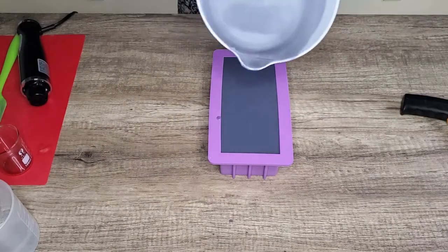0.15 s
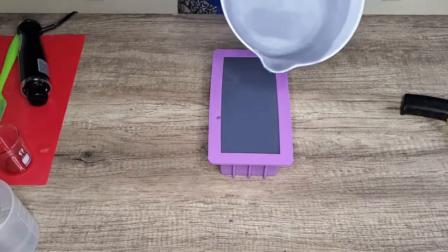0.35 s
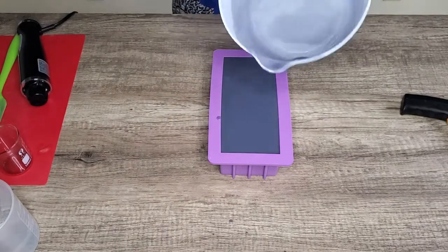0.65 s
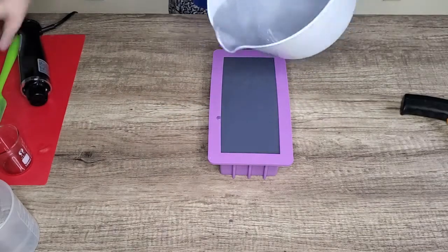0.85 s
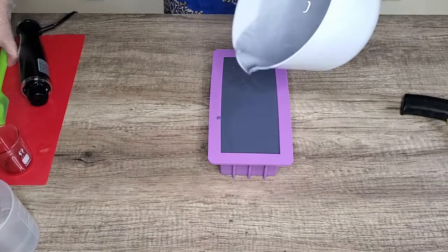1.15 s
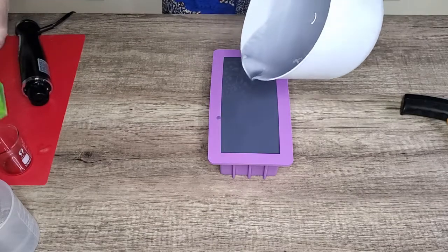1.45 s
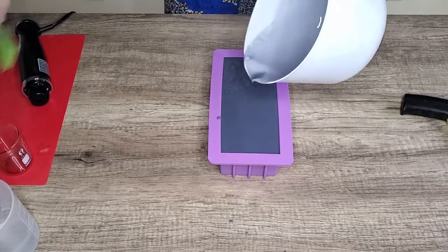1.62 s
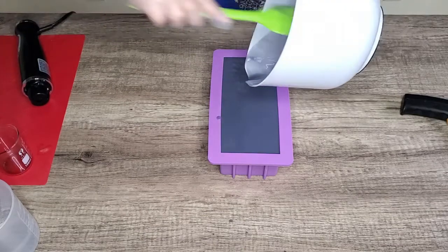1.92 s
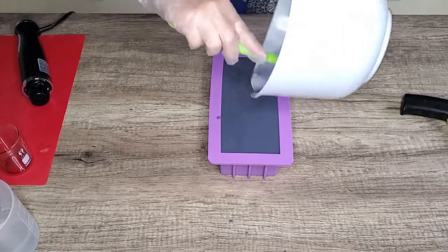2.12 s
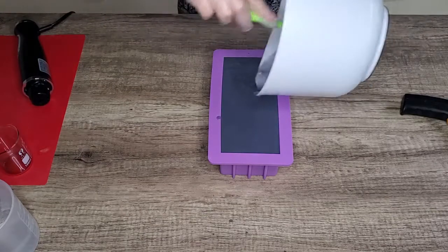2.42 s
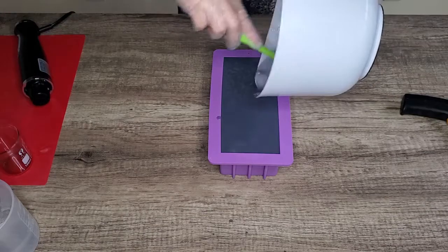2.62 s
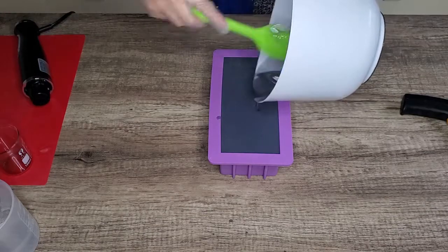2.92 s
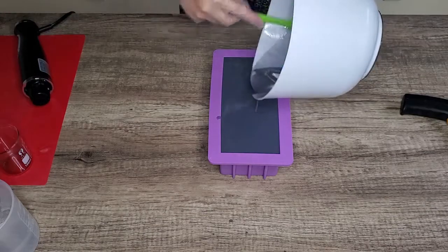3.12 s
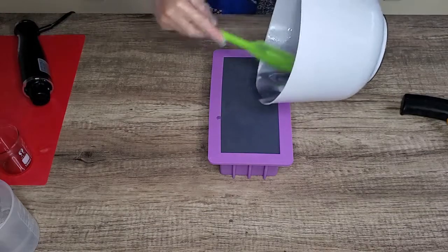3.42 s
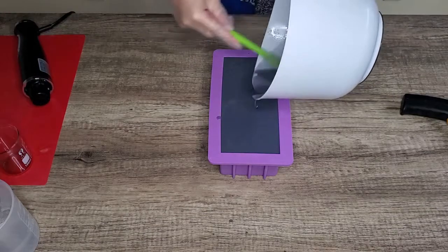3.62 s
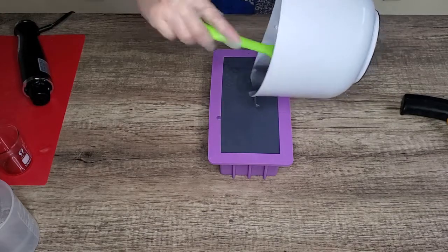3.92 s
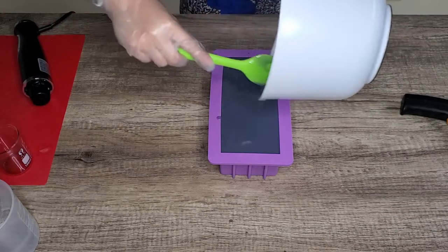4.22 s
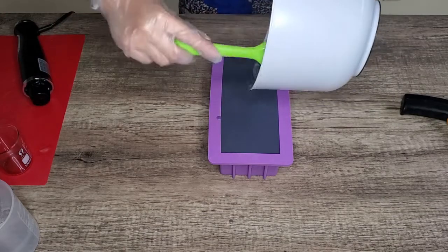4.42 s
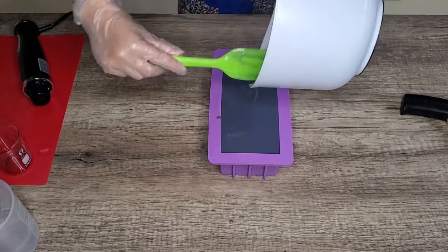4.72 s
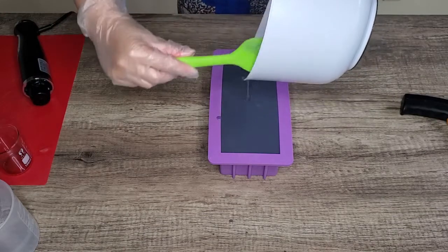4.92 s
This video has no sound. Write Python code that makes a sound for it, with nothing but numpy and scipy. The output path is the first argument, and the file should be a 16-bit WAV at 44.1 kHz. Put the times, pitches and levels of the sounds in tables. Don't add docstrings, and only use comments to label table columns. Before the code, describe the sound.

Cloth rustles and something is dragged and peeled off a mat, then a soft spatula knocks dully and hollowly on a plastic bowl in a quiet room.

```python
import sys
import numpy as np
from scipy import signal
from scipy.io import wavfile

SR = 44100
rng = np.random.default_rng(int(sys.argv[2]) if len(sys.argv) > 2 else 0)


def linear_from_db(decibels):
    return 10 ** (np.asarray(decibels, float) / 20)


def store_wav(level_fs):
    pcm = np.round(np.clip(np.atleast_2d(level_fs), -1, 1) * 32767)
    wavfile.write(sys.argv[1], SR, pcm.T.astype(np.int16))


N = 223078
EARLY = round(2.4 * SR)

# [t/s, click level/dB, thud f/Hz, thud level over click/dB, middle wall modes over click/dB]
KNOCK_BLOWS = [(2.1213, -35, 337, 2, -6), (2.1623, -48.5, 286, 3, -10), (2.2, -57, 308, -14, -6),
               (3.1556, -41, 318, 1, -8), (3.692, -38.5, 295, 7, -3.5), (4.051, -57.5, 320, 10.5, 2),
               (4.0946, -64, 290, 12, -12), (4.275, -83, 700, 7, 2), (4.5254, -70, 740, 13.5, -1),
               (4.531, -82, 172, 28, 0), (4.5427, -83, 272, 23, -10), (4.588, -76, 318, 4, -1),
               (4.7272, -75, 264, 13, 3), (4.801, -92, 252, 13, -10), (5.0059, -75.5, 292, 27.5, 18.5)]


def knocks():
    return soft_blows(KNOCK_BLOWS, thud_cycles=7.3)


# [t/s, click level/dB, thud f/Hz, thud level over click/dB, middle wall modes over click/dB]
HANDLE_DROPS = [(0.548, -80.5, 202, 19.5, 19), (.657, -72, 182, 17, 19.5), (1.048, -78, 237, 34, 23),
                (1.072, -80.5, 244, 37, 0), (1.108, -78, 332, 38.5, 3), (1.126, -79, 342, 38, 16),
                (1.113, -77, 231, 33.5, 23), (1.325, -94, 264, 30, 2), (2.653, -87.5, 199, 31, 4)]


def handle_drops():
    return soft_blows(HANDLE_DROPS, thud_cycles=18.4)


# [f/Hz, level/dB, t60/s]
WALL_MODES = [
    [(500, -7, 0.053), (624.4, -5, 0.034), (816, -2.5, 0.012)],
    [(1150, -1, 0.0083), (1407, 2, 0.01)],
    [(1785, -2, 0.0043), (2350, 5, 0.0038), (2920, -7.5, 0.0036)],
]


def soft_blows(rows, thud_cycles):
    out = np.zeros((2, N))
    for s, click_db, hz, thud_db, middle_db in rows:
        thud_s = s - 0.00073
        level_db = click_db + thud_db
        add(out, thud_s, level_db, hz, thud_cycles / hz, 1.5, rise=0.39, sign=-1.87)
        add(out, thud_s, level_db - 4, 80, .06, 0, rise=0.022)
        add(out, s, level_db - 9, 165, .05, 0, rise=0.2)

        low_db = -7.5 + 0.97 * thud_db
        modes = []
        for extra_db, group in zip((low_db, middle_db, 0), WALL_MODES):
            modes += [(extra_db, *mode) for mode in group]
        modes.append((-0.7 * thud_db, 3544.5, -15, 0.0144))
        for k, (extra_db, mode_hz, mode_db, t60) in enumerate(modes):
            sign = (-1) ** k
            add(out, s, click_db + extra_db + mode_db + 6.5, mode_hz, t60, 1.5, rise=1.0, sign=sign)
    return lowpass(out, 3, 3060)


# [f/Hz, level/dB, t60/s, swell/cycles]
BELLY_BLOWS = [
    (2.562, [(634, -31.5, 0.065, 0.17), (743, -27, 0.019, 0.34), (990, -37, 0.018, 0.15), (500, -24, 0.025, 0.26), (1400, -53, 0.02, 0.42), (1960, -34, 0.0046, 0.47), (341.5, -34, 0.47, 2.8), (285, -42.5, 0.13, 0.91)]),
    (2.587, [(404.6, -28, 0.15, 1.1), (435.3, -26.5, 0.14, 1.4)]),
    (2.621, [(495, -38, 0.17, 4.2), (509.6, -30.5, 0.42, 3.6), (440, -43, 0.36, 3.6)]),
]


def bonk(lasting):
    out = np.zeros((2, N))
    for s, modes in BELLY_BLOWS:
        for k, (hz, db, t60, swell) in enumerate(modes):
            if (t60 > 0.15) == lasting:
                add(out, s, db, hz, t60, .4, swell, sign=(-1) ** k)
    return lowpass(out, 2, 3200)


# [t/s, level/dB, main f/Hz, second f/Hz, second level/dB]
HARD_TICKS = [
    (.986, -71, 9600, 11800, -2),
    (1.158, -52.5, 2300, 1280, -8),
    (1.109, -41.5, 2710, 4600, -8),
    (2.189, -70, 4000, 2200, 4),
    (2.644, -65.5, 9440, 3580, 2.5),
    (3.21, -79, 4340, 3000, 10),
]
# [t/s, level/dB, main f/Hz, second f/Hz, second level/dB]
PEEL_SNAPS = [
    (1.0447, -45, 2650, 4930, -7),
    (1.054, -42, 3380, 6870, -11),
]


def ticks():
    out = np.zeros((2, N))
    for rows, pan_db in ((HARD_TICKS, 2), (PEEL_SNAPS, 3.5)):
        for s, db, hz, hz2, db2 in rows:
            add(out, s, db + 10, hz, .008, pan_db, rise=0.98)
            add(out, s, db + db2 + 6.0, hz2, .008, pan_db, rise=0.22)
    return out


# [start t/s, hold/s, level/dB]
SMEAR_STROKES = [
    (2.27, 0.035, -75),
    (2.76, 0.017, -80),
    (3.26, 0.0099, -69),
    (4.17, 0.046, -81),
]
# [f/Hz, level/dB per Hz]
BATTER_COLOUR = [(700, -31), (1000, 3.5), (1400, -2.5), (1900, -13), (3000, -16), (5000, -24)]


def smear():
    level_db, = strokes(SMEAR_STROKES, rise=74, fall=155)
    return linear_from_db(level_db) * noise(BATTER_COLOUR, 3.2, 4.3)


# [t/s, f/Hz, level/dB]
MOAN_CURVE = [(4.25, 504.0, -92), (4.286, 519, -93), (4.314, 535, -77.5), (4.468, 547.3, -70),
              (4.514, 529, -87), (4.55, 616, -61)]


def moan():
    s, *columns = np.transpose(MOAN_CURVE)
    t = np.arange(N) / SR
    hz, db = [np.interp(t, s, c, left=-150, right=-150) for c in columns]
    return np.sqrt(2) * linear_from_db(db + 1.0 * drift(20, N)) * np.sin(2 * np.pi * np.cumsum(hz) / SR)


# [start t/s, hold/s, crackle level/dB, swish level/dB]
PEEL_STROKES = [
    (1.044, 0.0081, -38, -66),
    (1.075, 0.017, -46.5, -71.5),
    (1.108, .008, -45, -80),
    (1.15, 0.034, -50, -74.5),
]
# [f/Hz, level/dB per Hz]
STICKY_COLOUR = [(880, -53), (1500, -24), (1770, -4.5), (2180, -21), (2640, 4), (3460, -2), (3740, -14),
                 (4150, -5), (12000, -20), (15600, -63), (22000, -120)]


def peel(swish):
    crackle_db, swish_db = strokes(PEEL_STROKES, rise=5000, fall=213)
    return linear_from_db(crackle_db - 5.5) * noise(STICKY_COLOUR, 2.35, 28, size=EARLY) + linear_from_db(swish_db) * swish


# [start t/s, hold/s, rumble level/dB, rasp level/dB]
DRAG_STROKES = [
    (0.59, .01, -59.5, -75),
    (0.664, 0.007, -53, -56.5),
    (0.7, 0.081, -60.5, -87),
    (1.056, 0.041, -48, -53.5),
    (1.136, .008, -52, -63),
    (1.155, 0.045, -43.5, -42),
    (1.19, .015, -49, -48),
]
# [f/Hz, level/dB per Hz]
MAT_COLOUR = [(35, -45), (60, -21), (173, -83), (237, 2.5), (422, 4.5), (478, -11), (776, -8.5),
              (1150, -22.5), (2500, -31), (3250, -44), (5500, -120)]
# [f/Hz, width/Hz, level/dB]
TABLE_MODES = [(140, 18, -5), (237, 25, 14.5), (320, 20, -3), (431, 6.8, 16), (581, 21, 14.5), (798, 19, 6),
               (990, 26, 4.5), (1286, 9.3, 14.5), (1607, 60, 11)]


def dragging():
    rubbing = lifted(noise(MAT_COLOUR, 3.2, 28, size=EARLY), TABLE_MODES)
    low = lowpass(rubbing, 4, 770)
    high = signal.sosfilt(signal.butter(4, 770, "high", fs=SR, output="sos"), rubbing)
    rumble_db, rasp_db = strokes(DRAG_STROKES, rise=710, fall=204)
    mix = linear_from_db(rumble_db - 3.0) * rms_one(low) + linear_from_db(rasp_db) * rms_one(high)
    left, right = np.sqrt(EARLY / N) * mix
    return np.array([left, np.roll(right, round(0.00026 * SR))])


# [start t/s, hold/s, rub level/dB, swish level/dB]
SLEEVE_STROKES = [
    (0.066, 0.11, -56.5, -62),
    (0.2, 0.2, -63, -66),
    (0.39, 0.024, -57.5, -64),
    (0.55, .085, -57.5, -60.5),
    (0.662, 0.017, -53, -53),
    (0.9, 0.048, -73, -71.5),
]
# [f/Hz, level/dB per Hz]
RUB_COLOUR = [(530, -63), (900, -15), (1110, -27), (1320, -11), (2020, 0), (3710, 1), (4640, -5),
              (7000, -11.5), (9100, -50), (15400, -120)]


def sleeves(swish):
    rub_db, swish_db = strokes(SLEEVE_STROKES, rise=119, fall=183)
    return linear_from_db(rub_db) * noise(RUB_COLOUR, 1.4, 14, size=EARLY) + linear_from_db(swish_db) * swish


# [start t/s, hold/s, crinkle level/dB, swish level/dB]
REACH_STROKES = [
    (1.19, 0.004, -65, -66.5),
    (1.3, 0.027, -72.5, -81),
    (1.35, .02, -69, -72),
    (1.385, 0.019, -64.5, -69.5),
    (1.525, 0.012, -75.5, -80),
    (1.685, 0.034, -77, -88),
    (1.86, 0.066, -67.5, -83),
    (2.13, .07, -77.5, -79),
]
# [f/Hz, level/dB per Hz]
GLOVE_COLOUR = [(1180, -24), (2000, -16), (3070, -7), (3520, -8), (3870, -3.5), (5610, -7), (6450, 1),
                (7270, -12), (9000, -14), (11700, -40), (19800, -120)]


def glove(swish):
    crinkle_db, swish_db = strokes(REACH_STROKES, rise=315, fall=163)
    return linear_from_db(crinkle_db) * noise(GLOVE_COLOUR, 1.0, 21, size=EARLY) + linear_from_db(swish_db) * swish


# [f/Hz, level/dB per Hz]
SWISH_COLOUR = [(2650, -27), (4500, -4), (4770, -36.5), (5460, -10.5), (8120, -8), (12400, -6.5),
                (15700, -12)]


def handling():
    swish = noise(SWISH_COLOUR, 0.95, 34, size=EARLY)
    return (sleeves(swish) + glove(swish) + peel(swish)) * pan(1.5)


# [f/Hz, t60/s, level/dB]
REFLECTIONS = [(61, 0.17, -1), (290, 0.37, -4), (637, 0.38, -4), (1190, 0.43, -3.5), (3000, 0.32, -2.5),
               (10000, 0.28, -2)]


def room(x):
    t = np.arange(SR // 2) / SR
    table = np.array(REFLECTIONS)
    tail = 0
    for hz, band in stereo_bands(29, 16000, size=len(t)):
        tail = tail + linear_from_db(at_hz(table[:, ::2], hz) - 60 * t / at_hz(table, hz)) * band
    tail = tail * np.clip(t / 0.001 - 1, 0, 1)
    return linear_from_db(-23.5) * signal.fftconvolve(x, tail, axes=1)[:, :N]


# [start t/s, hold/s, deep level/dB, boom level/dB]
HOUSE_SWELLS = [(0.0, 0.28, -55.5, -67), (.26, 0.49, -65, -63), (0.68, 0.075, -52.5, -60.5),
                (.82, 0.14, -62, -59), (1.08, .1, -54, -67), (1.2, 0.0068, -55, -50.5),
                (1.42, 0.12, -63, -65), (1.72, 0.15, -62.5, -62), (1.92, 0.23, -63.5, -64),
                (2.6, 0.089, -61, -61.5), (3.19, 0.06, -58.5, -59.5), (3.48, 0.039, -64.5, -79),
                (3.9, 0.27, -63, -66.5)]
# [f/Hz, level/dB per Hz]
DEEP_COLOUR = [(13, -31), (22, 1), (43, -1.5), (59, -1.5), (81, -2), (113, -27), (130, 4.5), (170, -50.5),
               (290, -120)]
BOOM_COLOUR = [(59, -50.5), (100, -2.5), (277, -1.5), (312, -6), (430, -7), (533, -6), (581, -11),
               (705, -10.5), (963, -35), (1300, -4.5), (1690, -49.5), (2860, -120)]
# [f/Hz, width/Hz, level/dB]
STANDING_WAVES = [(237, 15, -13.5), (320, 14, 1), (534.7, 25, 5.5), (724, 14.5, 7.5)]


def house():
    deep_db, boom_db = strokes(HOUSE_SWELLS, rise=73.5, fall=70)
    deep_db = np.maximum(deep_db, -68.5)
    boom_db = np.maximum(boom_db, -67.5)
    deep = lifted(noise(DEEP_COLOUR, 3.3, 20), [(37.65, 2.5, 6), (78.6, 4.2, 2.3)])
    boom = lifted(noise(BOOM_COLOUR, 2.3, 7), STANDING_WAVES)
    return linear_from_db(deep_db) * rms_one(deep) + linear_from_db(boom_db) * rms_one(boom)


# [f/Hz, level/dB per Hz]
HISS_COLOUR = [(530, -23.5), (900, -8.5), (979, -4), (1260, -28.5), (1870, -5), (5810, -10), (6630, -28),
               (7650, -13), (14400, -10), (15700, 0)]


def hiss():
    whine = (6820, 390, 0.58)     # f/Hz, width/Hz, level/dB
    return linear_from_db(-82.5) * lifted(noise(HISS_COLOUR, 0.53, 30), [whine]) * pan(1.1)


def add(out, s, db, hz, t60, pan_db, rise, sign=1):
    start = round(s * SR)
    t = np.arange(min(N - start, int(1.5 * t60 * SR))) / SR
    swell = 1 - np.exp(-t * hz / rise)
    mode = sign * linear_from_db(db - 60 * t / t60) * swell * np.sin(2 * np.pi * hz * t)
    out[:, start:start + len(t)] += mode * pan(pan_db / 2)


def strokes(rows, rise, fall):
    start, hold, *levels = np.transpose(rows)[..., None]
    t = np.arange(N) / SR
    loss_db = rise * np.maximum(start - t, 0) + fall * np.maximum(t - start - hold, 0)
    return [np.max(level_db - loss_db, axis=0) for level_db in levels]


def noise(spectrum, patchy_db, rate, size=N):
    together = drift(rate / 3, size)
    x = 0
    for hz, band in stereo_bands(spectrum[0][0], spectrum[-1][0], size):
        flicker_db = patchy_db * (1.33 * together + drift(rate, size))
        x = x + linear_from_db(at_hz(spectrum, hz) + flicker_db) * band
    return np.pad(rms_one(x), [(0, 0), (0, N - size)])


# [f/Hz, likeness/0 to 1]
LEFT_RIGHT_LIKENESS = [(30, 0.9), (125, 0.8), (300, 0.85), (600, 0.56), (1200, 0), (4000, 0.11), (16000, 0)]


def stereo_bands(low_hz, high_hz, size):
    white = rng.standard_normal((2, 2, size))
    edges = 20 * 2 ** (np.arange(30) / 3)
    for k, (low, high) in enumerate(zip(edges, edges[1:])):
        if high > low_hz and low < high_hz:
            centre = np.sqrt(low * high)
            band = signal.butter(2, [low, high], "band", fs=SR, output="sos")
            mid, side = signal.sosfilt(band, white[k % 2])
            alike = np.clip(at_hz(LEFT_RIGHT_LIKENESS, centre), 0, 1)
            yield centre, np.sqrt(1 + alike) * mid + np.sqrt(1 - alike) * side * [[1], [-1]]


def drift(rate, size):
    r = np.exp(-80 * np.pi * rate / SR)
    chance = rng.standard_normal(size // 40 + 2002)
    slow = signal.lfilter([1], [1, -2 * r, r * r], chance)[2000:]
    return np.interp(np.arange(size) / 40, np.arange(len(slow)), rms_one(slow))


def lifted(x, resonances):
    return x + sum(linear_from_db(db) * signal.lfilter(*signal.iirpeak(hz, hz / width, fs=SR), x)
                   for hz, width, db in resonances)


def lowpass(x, order, hz):
    return signal.sosfilt(signal.butter(order, hz, fs=SR, output="sos"), x)


def pan(db):
    return linear_from_db(np.array([[db], [-db]]))


def rms_one(x):
    return x / np.sqrt(np.mean(x ** 2) + 1e-20)


def at_hz(points, hz):
    return np.interp(np.log(hz), np.log(np.array(points)[:, 0]), np.array(points)[:, 1])


def scene():
    struck = knocks() + handle_drops() + ticks()
    brief, lasting = bonk(False), bonk(True)
    wet = room(struck + linear_from_db(-0.5) * brief + linear_from_db(-26.5) * lasting)
    blows = struck + brief + lasting + wet
    return blows + handling() + smear() + dragging() + moan() + house()


def top_cut(x):
    return signal.sosfilt(signal.butter(12, 15820, fs=SR, output="sos"), x)


def record(dry):
    return top_cut(dry + hiss())


dry = scene()
out = record(dry)
store_wav(out)
```